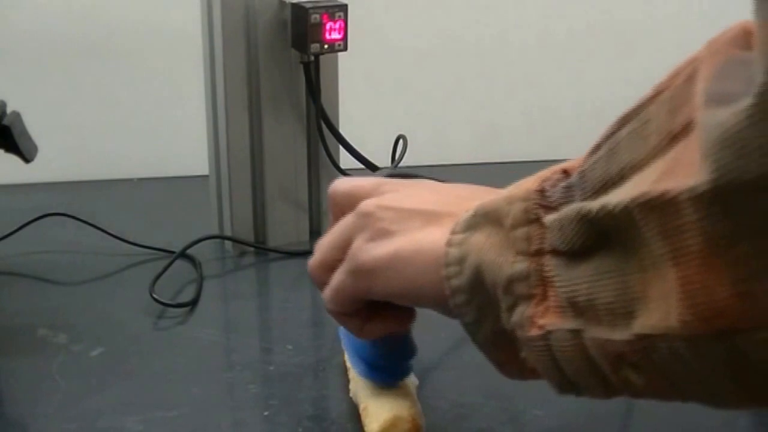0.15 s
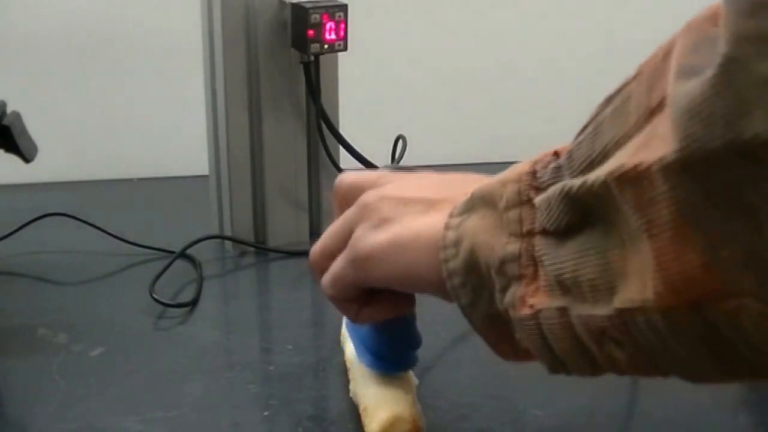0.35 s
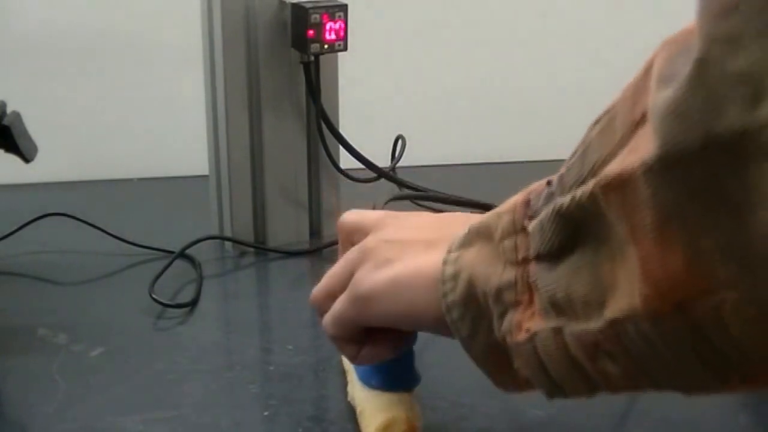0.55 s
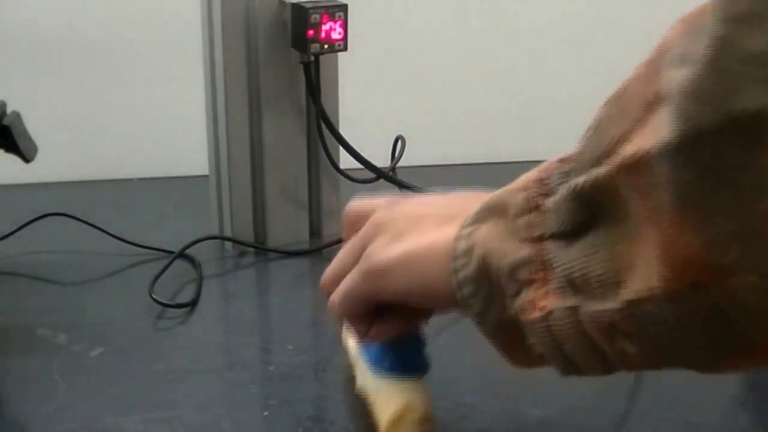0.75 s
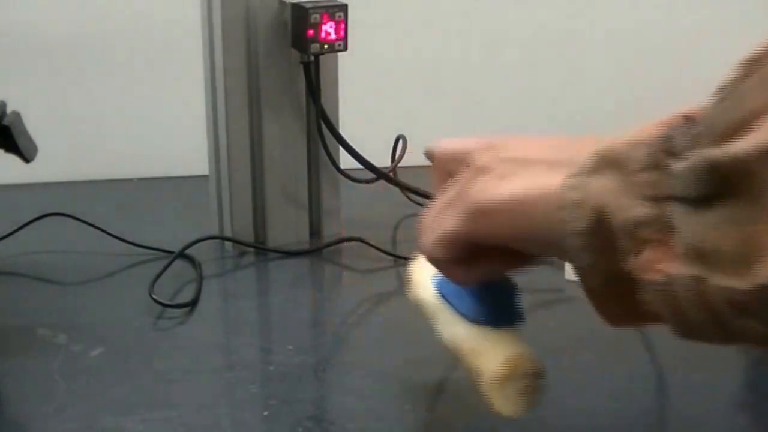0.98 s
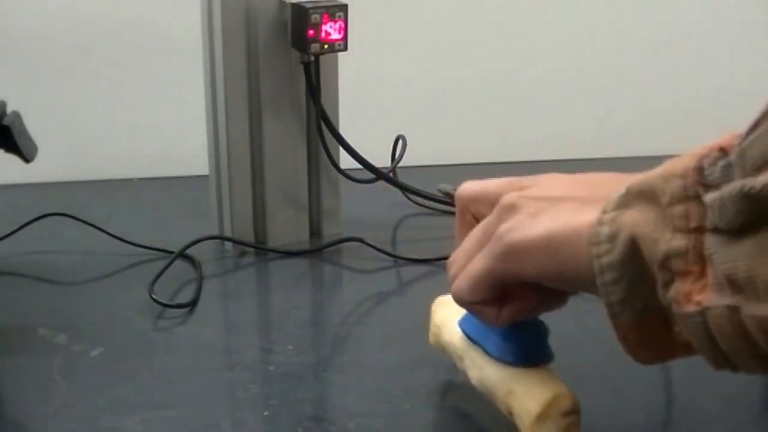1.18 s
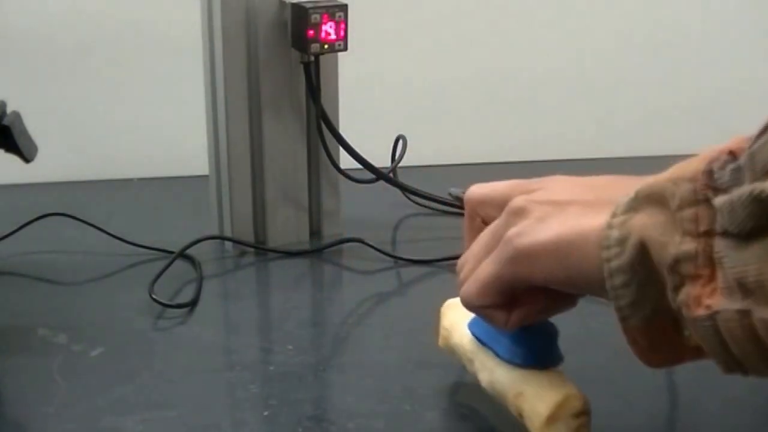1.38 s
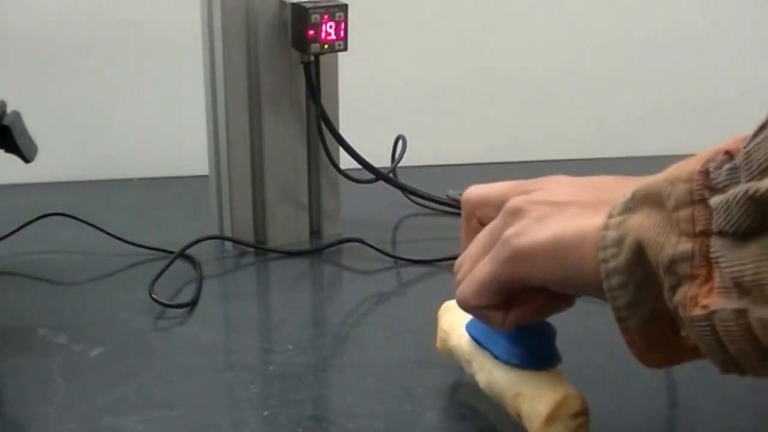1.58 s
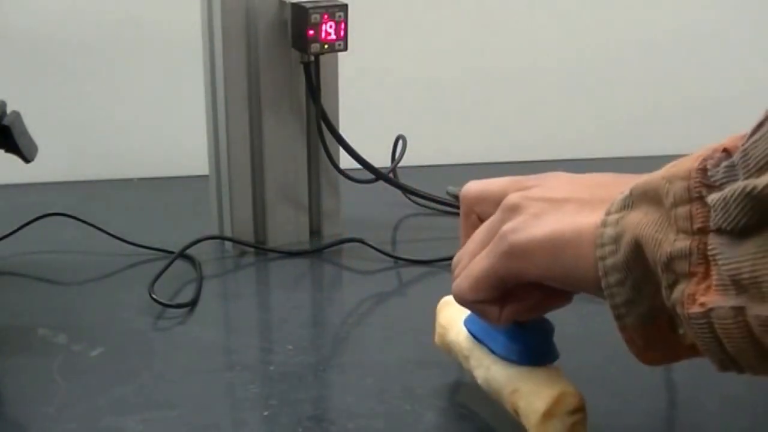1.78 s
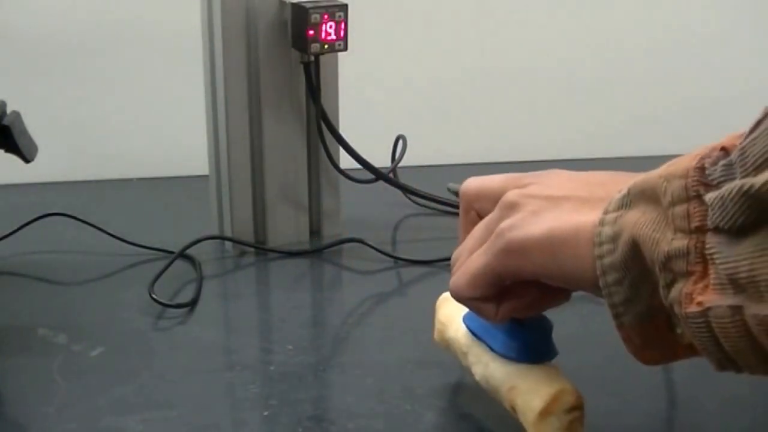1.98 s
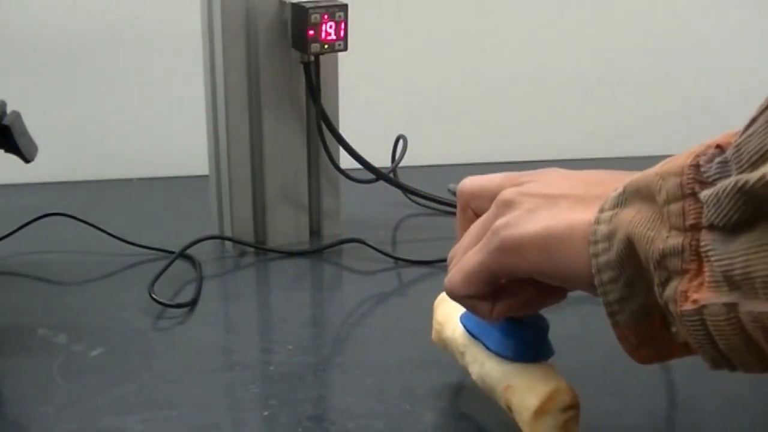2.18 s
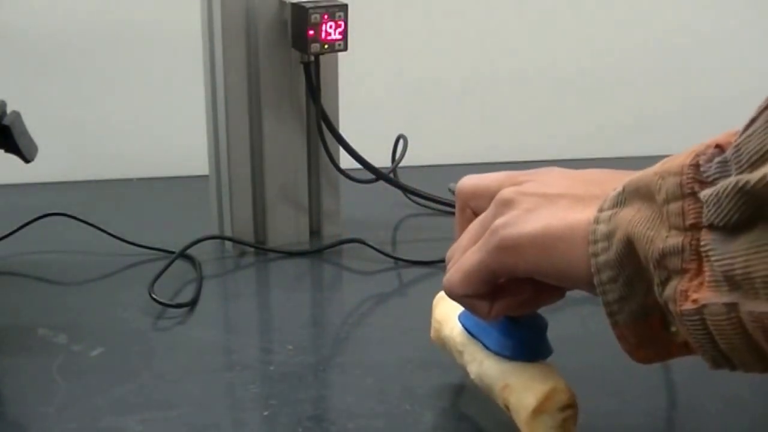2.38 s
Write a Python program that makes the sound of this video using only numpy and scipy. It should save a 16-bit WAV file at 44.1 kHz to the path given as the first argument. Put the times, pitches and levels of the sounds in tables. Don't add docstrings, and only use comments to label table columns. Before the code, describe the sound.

Loud bright hiss of a compressed-air vacuum ejector starting abruptly after a brief low room hum

```python
import sys
import numpy as np
from scipy import signal
from scipy.fft import rfft, irfft, next_fast_len
from scipy.io import wavfile
from scipy.ndimage import uniform_filter1d, map_coordinates

SR = 44100
rng = np.random.default_rng(int(sys.argv[2]) if len(sys.argv) > 2 else 0)


def boost(x):
    u = np.asarray(x, float) / 20
    return 10 ** u


def unload_audio(sound):
    columns = np.transpose(np.atleast_2d(sound))
    steps = np.round(np.clip(columns, -1, 1) * 32767)
    wavfile.write(sys.argv[1], SR, steps.astype(np.int16))


N = 107648

# pitch_hz, density_db
ROOM_SPECTRUM = [(15, -55), (25, -21.5), (121, -21), (158, -24.5), (529, -33), (673, -32), (903, -36.5),
                 (1860, -39.5), (15000, -56)]
# pitch_hz, likeness_share
ROOM_LIKENESS = [(30, 0.72), (120, 0.74), (400, 0.72), (2000, 0.49), (10000, .3)]
# multiple_of_hum, level_db
HUM_BUZZ = [(4, -60.5), (5, -67.5), (7, -64), (10, -66), (15, -67), (16, -64.5), (19, -67), (24, -66)]
# pitch_hz, t60_s
WALL_DECAY = [(200, 0.22), (2000, 0.067), (10000, 0.3)]
# pitch_hz, density_db
BURST_SPECTRUM = [(40, -25), (120, -6), (250, -8), (1300, -10.5), (2700, 0), (3500, -1), (6300, -3),
                  (15000, -24)]
# pitch_hz, density_db
JET_SPECTRUM = [(60, -33), (300, -30), (900, -25), (1500, -24), (2200, -17), (6000, -12.5), (12100, -21),
                (15500, -22)]
# time_s, level_db
JET_LEVEL = [
    (.25, -17.5),
    (.45, -19.5),
    (.62, -20),
    (.76, -17),
    (.92, -19),
    (1.06, -19.5),
    (1.16, -20.5),
    (1.5, -19.5),
    (2.0, -20),
    (2.44, -21),
]
# time_s, left_over_right_db
JET_PAN = [(.25, 3.5), (.35, 3), (.55, 3.5), (.75, 1.5), (1.2, 1), (2.44, 2.3)]
# pitch_hz, share
PAN_SHARE = [(300, 1.1), (1300, 0.66), (2400, 0.14), (4400, .05), (6000, 0.8), (9000, 0.96), (15000, 1.2)]
# time_s, pose_number (0 = raised, 4 = held; later stays held)
HAND_POSE = [(.25, 0), (.5, 0), (.63, 0.3), (.69, 1), (.8, 0.5), (.9, 1.43), (.96, 2), (1.07, 3.5),
             (1.16, 3), (1.28, 4), (2.44, 8)]
# centre_hz, width_hz, level_db
RAISED_CUP = [(1940, 700, -12), (4700, 1400, -8.5), (5650, 530, -18), (6960, 1300, -9), (8120, 920, -3.5),
              (9340, 1640, -3), (10730, 1200, -4), (13100, 1500, -14), (14800, 1200, -13)]
PRESSED_CUP = [(2250, 1080, -9.5), (4680, 870, 2.5), (5320, 830, 1), (6650, 1500, -5), (8030, 1400, 3),
               (9130, 1250, 3.5), (10300, 1300, -9.5), (12900, 1200, -11.5), (14900, 900, -14)]
LIFTING_CUP = [(2400, 2100, -22.5), (4850, 890, 0.5), (5400, 500, -19), (6650, 700, -18), (7700, 750, 0),
               (8360, 660, 2), (10200, 1300, -2), (13000, 1200, -13), (15100, 700, -12)]
SWINGING_CUP = [(2950, 830, -19.5), (4090, 510, -7), (5480, 650, -3.5), (6930, 1000, -9.5),
                (7740, 380, -12), (8560, 600, -10), (9180, 1060, -5.5), (12700, 1200, -18),
                (15100, 900, -14)]
HELD_CUP = [(3090, 210, -9), (4490, 855, -0.5), (5800, 410, -15), (6840, 700, -10.5), (7560, 820, -6),
            (9575, 770, -3), (10160, 1030, -4.5), (13170, 960, -8.5), (15000, 780, -24)]
# middle_s, length_s
WIDE_MOMENTS = [
    (.31, 0.61),
    (.72, .04),
    (1.31, 0.069),
    (1.568, 0.056),
    (2.146, .1),
]

OPEN_S = 0.2515
TOP_HZ = 15350


def unit(x):
    return x / np.sqrt(np.mean(x ** 2) + 1e-20)


def along(points, hz):
    pitch, value = np.transpose(points)
    return np.interp(np.log(hz + 1), np.log(pitch + 1), value)


def curve(rows, t):
    return np.interp(t, *np.transpose(rows))


def wobble(rate_hz):
    knots = rng.standard_normal(int(N * rate_hz / SR) + 4)
    return map_coordinates(knots, [np.arange(N) * rate_hz / SR])


def filtered(x, response):
    size = next_fast_len(N + 8192)
    hz = np.fft.rfftfreq(size, 1 / SR)
    return irfft(rfft(x, size) * response(hz), size)[..., :N]


def noise(spectrum, channels=1):
    white = rng.standard_normal((channels, N))
    return unit(filtered(white, lambda hz: boost(along(spectrum, hz))))


def since_open():
    return np.maximum(np.arange(N) / SR - OPEN_S, 0)


def swell(rise_s):
    return 1 - np.exp(-(since_open() / rise_s) ** 2)


def room():
    def turn(hz):
        return np.arccos(np.clip(along(ROOM_LIKENESS, hz), 0, 1)) / 2

    mid, side = filtered(noise(ROOM_SPECTRUM, channels=2),
                         lambda hz: np.array([np.cos(turn(hz)), np.sin(turn(hz))]))
    rumble = boost(-46.5) * np.array([mid + side, mid - side])

    hum_hz, hum_db, sway_db = 117, -42, -2
    phase = 2 * np.pi * hum_hz * np.arange(N) / SR
    hum = boost(hum_db + sway_db * wobble(26)) * np.sin(phase + 0.5 * wobble(6))
    buzz = sum(boost(db) * np.sin(round(multiple) * phase + 2 * np.pi * rng.random())
               for multiple, db in HUM_BUZZ)

    duck_db, duck_s, overshoot_db, recover_s = -13, 0.02, -11, 0.35
    gain_db = (duck_db + overshoot_db * np.exp(-since_open() / recover_s)) * swell(duck_s)
    return (rumble + np.sqrt(2) * (hum + buzz)) * boost(gain_db)


def walls(x):
    hz, t, z = signal.stft(rng.standard_normal((2, SR // 4)), SR, nperseg=256)
    decay = boost(-60 * t / along(WALL_DECAY, hz)[:, None])
    tail = signal.istft(z * decay, SR, nperseg=256)[1]
    tail = tail / np.linalg.norm(tail[0])
    delayed = np.pad(x, (60, 0))[None]
    return signal.fftconvolve(delayed, tail, axes=1)[:, :N]


def burst():
    level_db, rise_s, t60_s = 1, 0.0033, 0.034
    decay = boost(level_db - 60 * since_open() / t60_s)
    return noise(BURST_SPECTRUM)[0] * decay * swell(rise_s)


def jet_colour(hz, t):
    poses = np.array([RAISED_CUP, PRESSED_CUP, LIFTING_CUP, SWINGING_CUP, HELD_CUP], float)
    pose = np.clip(curve(HAND_POSE, t), 0, len(poses) - 1.001)
    k, part = pose.astype(int), pose % 1
    share = part[:, None, None]
    centre, width, db = ((1 - share) * poses[k] + share * poses[k + 1]).T[..., None, :]
    offset = 2 * (hz[:, None] - centre) / width
    peaks = np.sum(boost(2 * db) / (1 + offset ** 2) ** 2, axis=0)
    broad = boost(along(JET_SPECTRUM, hz))[:, None]

    ripple_db = 1.6
    ripples = unit(uniform_filter1d(rng.standard_normal((len(hz), len(poses))), size=2, axis=0))
    ripples = ripples * (hz[:, None] > 1000)
    ripple = ripples[:, k] * np.sqrt(1 - part) + ripples[:, k + 1] * np.sqrt(part)

    near = np.sqrt(peaks + broad ** 2) * boost(ripple_db * ripple)
    far_colour = 0.74
    far = near ** far_colour * broad ** (1 - far_colour)
    return [gain / np.sqrt(np.mean(gain[hz < TOP_HZ] ** 2, axis=0)) for gain in (near, far)]


def jet():
    hz, t, z = signal.stft(rng.standard_normal(N), SR, nperseg=512)
    near, far = jet_colour(hz, t)
    pan = boost(np.outer(along(PAN_SHARE, hz), curve(JET_PAN, t)) / 2)

    patchy_db = 0.55
    field = uniform_filter1d(rng.standard_normal(z.shape), size=6, axis=0)
    field = unit(uniform_filter1d(field, size=10, axis=1))
    coloured = z * boost(patchy_db * field) * [near * pan, near / pan, far]
    hiss = unit(signal.istft(coloured, nperseg=512)[1][:, :N])

    flutter_db, drift_db, rise_s = 0.13, 0.48, 0.0044
    level_db = curve(JET_LEVEL, np.arange(N) / SR)
    level_db = level_db + flutter_db * wobble(59.6) + drift_db * wobble(8.81)
    return hiss * boost(level_db) * swell(rise_s)


def scene():
    air = jet() + burst()
    walls_db = -9
    return air[:2] + boost(walls_db) * walls(air[2]) + room()


def narrowed(side):
    narrow_hz, band_hz, keep_over = 1400, 400, 1.05
    hz, t, z = signal.stft(side, SR, nperseg=1024)
    band = (hz / band_hz).astype(int)
    luck = rng.standard_normal((band.max() + 1, len(t) + 1))
    lasting, passing = luck[:, :1], unit(uniform_filter1d(luck[:, 1:], size=7, axis=1))
    luck = 0.6 * lasting + 0.8 * passing
    wide = sum(np.abs(t - middle) < length / 2 for middle, length in WIDE_MOMENTS) > 0
    keep = (luck[band] > keep_over) | wide | (hz[:, None] < narrow_hz)
    return signal.istft(z * keep, nperseg=1024)[1][:N]


def band_limit(x):
    return signal.sosfilt(signal.butter(12, 16680, fs=SR, output="sos"), x)


def record(dry):
    ceiling = 0.91
    sound = dry / (1 + np.abs(dry / ceiling) ** 4) ** (1 / 4)

    hush_s, hush_hz, hush_db = 0.016, 2000, -14
    ahead_s = OPEN_S - np.arange(N) / SR
    hush = (1 - boost(hush_db)) * (ahead_s > 0) * (ahead_s < hush_s)
    sound = sound - hush * filtered(sound * (ahead_s > 0), lambda hz: hz > hush_hz)

    mid = sound.mean(axis=0)
    side = narrowed((sound[0] - sound[1]) / 2)
    stereo = np.array([mid + side, mid - side])
    mix = filtered(stereo, lambda hz: np.clip((TOP_HZ - hz) / 60, 0, 1))
    return band_limit(mix)


dry = scene()
out = record(dry)
unload_audio(out)
```